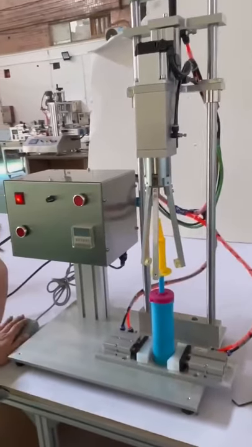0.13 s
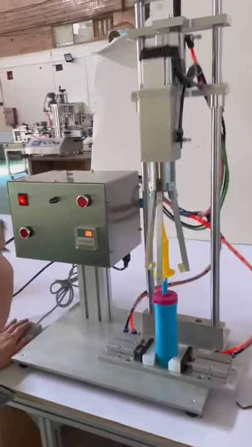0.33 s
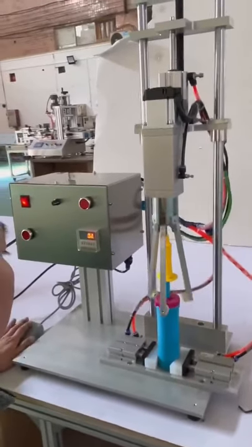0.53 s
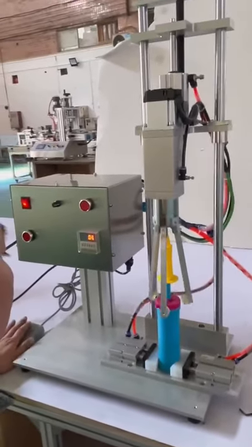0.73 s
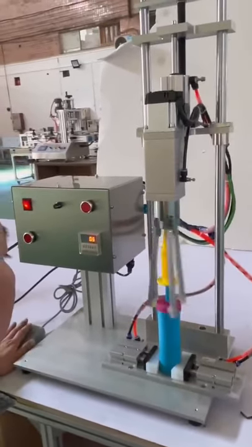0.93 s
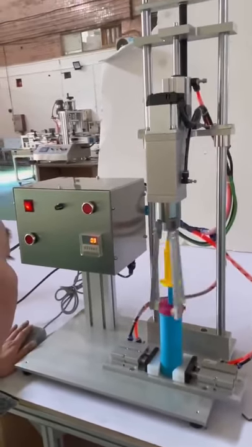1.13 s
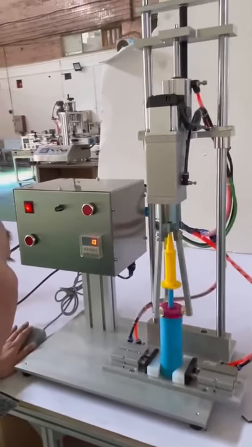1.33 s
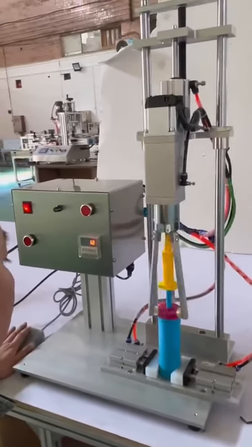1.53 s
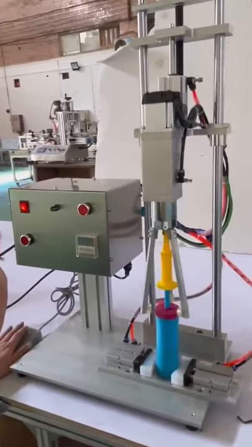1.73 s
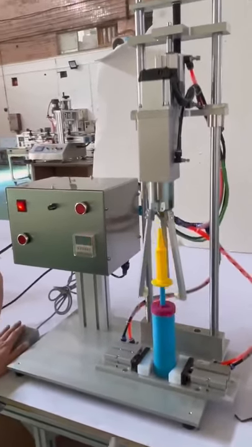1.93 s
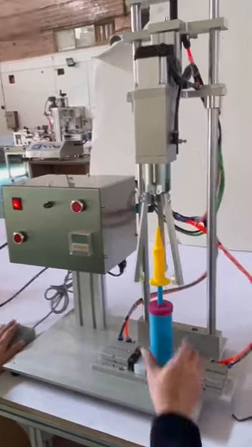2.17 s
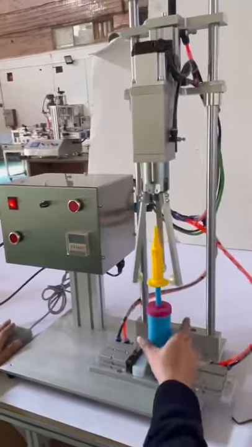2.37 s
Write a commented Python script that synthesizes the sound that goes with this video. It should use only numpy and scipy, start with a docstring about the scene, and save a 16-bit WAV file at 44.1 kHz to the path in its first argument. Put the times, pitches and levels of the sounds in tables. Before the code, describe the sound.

A pneumatic capping machine hisses, thumps and clacks through one cycle over low workshop rumble.

```python
"""Faint ticks over a low workshop rumble, then a valve snaps and dumps air: a pneumatic capping machine
runs one cycle, close to the microphone. The head hisses down and thumps onto its stop, and the jaws
clack shut on the cap. Hard blows run through the frame as short, sinking thumps and ring the bench.
A second blast frees the jaws and the head hisses back up. The limiter ducks after every loud blow."""
import sys
import numpy as np
from scipy import signal
from scipy.fft import rfft, irfft
from scipy.io import wavfile

SR = 44100
rng = np.random.default_rng(int(sys.argv[2]) if len(sys.argv) > 2 else 0)


def dump_mix(stems):
    """Bounce the given channels to the path in sys.argv[1] as a 16-bit WAV at rate SR."""
    frames = np.atleast_2d(stems).T  # one column per channel
    limited = np.clip(frames, -1, 1)  # hard clip at full scale
    pcm = np.round(limited * 32767).astype(np.int16)
    wavfile.write(sys.argv[1], SR, pcm)


N = 105840
T = np.arange(N) / SR
HZ = np.maximum(np.arange(N + 1) * SR / (2 * N), 1)


def from_db(db):
    """Decibels to gain."""
    return 10 ** (np.asarray(db) / 20)


def unit_power(x):
    """Scale to a mean square of one."""
    return x / np.sqrt(np.mean(x ** 2) + 1e-20)


def coloured(x, colour):
    """Filter by a curve of (freq_hz, level_db)."""
    hz, db = np.transpose(colour)
    gain = from_db(np.interp(np.log(HZ), np.log(hz), db))
    return irfft(rfft(x, 2 * N) * gain)[:N]


def noise(colour):
    """Unit-power noise of a given colour."""
    return unit_power(coloured(rng.standard_normal(N), colour))


def envelope(start, rise, hold, t60):
    """Linear rise, hold, exponential fall, all in seconds."""
    t = T - start
    return np.clip(t / rise, 0, 1) * np.exp(-np.log(1000) * np.clip((t - rise - hold) / t60, 0, 10))


def burst(start, hz, octaves, rise_s, t60_s):
    """A brief chatter rings a broad resonance; its power starts near 1."""
    shape = envelope(start, rise_s, 0, t60_s)
    edges = np.clip([hz / 2 ** (octaves / 2), hz * 2 ** (octaves / 2)], 20, SR / 2 - 1000)
    band = signal.butter(2, edges, "band", fs=SR, output="sos")
    ring = signal.sosfilt(band, shape * rng.standard_normal(N) + 1e-18)
    return unit_power(ring) * np.sqrt(np.mean(shape ** 2))


# Room tone of the workshop, all around the microphone: freq_hz, level_db
ROOM_TONE = [(25, 2), (40, -1), (57, 9), (90, -5), (140, -6.5), (300, -14), (700, -20.5), (1500, -32),
             (3000, -39), (6000, -37.5), (8000, -41.5), (11000, -38), (12500, -74), (15000, -66)]

def workshop_rumble(level_db=-33):
    """Steady low noise behind the machine."""
    return from_db(level_db) * noise(ROOM_TONE)


# Hard metal contact, heard up close: freq_hz, level_db
CLICK_COLOUR = [(1500, -66), (3000, -5.5), (5800, 12), (8000, 8), (11000, 11), (13500, -9.5), (15500, -62)]
# Spool, piston and jaws: start_s, ring_db, pitch_hz, width_octaves, rise_s, t60_s, click_db, thud_db
KNOCKS = [(0.201, -34, 1140, 1.4, 0.0019, 0.037, -38.5, -55),
          (.220, -37, 1460, 2.7, 0.00033, 0.073, -23, -36),
          (0.2295, -15.5, 2130, 0.16, 0.0016, 0.04, -22, -46),
          (0.2351, 13.5, 2150, 0.78, 0.0002, 0.0082, 7, -1), (0.284, -11, 1010, 1, 0.0032, 0.039, -36, -48),
          (0.486, -26, 880, 1.46, 0.0019, 0.39, -43, -20),
          (0.493, -18.5, 1310, 1.65, 0.0005, 0.076, -20, -23),
          (0.5043, -25, 2480, 0.88, 0.00052, 0.016, -12, -26),
          (0.504, -12.5, 1160, 1.9, 0.0011, 0.11, -20.5, -12.5),
          (0.768, -21.5, 1920, 0.59, 0.0015, 0.033, -22, -30),
          (0.7752, 1, 1620, 1.13, 0.00099, 0.024, -2, 6), (0.785, -7, 1540, 0.52, 0.0026, 0.049, -17, -11),
          (0.7946, -3, 3470, 1.2, 0.00035, 0.02, 7.5, -29), (0.798, 0, 1110, 1.97, 0.0003, 0.039, -13, -13),
          (1.544, -35.5, 2080, 0.7, 0.00051, 0.27, -36.5, -37),
          (1.5595, 19, 1990, 0.58, 0.00011, 0.0037, -14, 8.5),
          (1.564, 0, 2910, .15, 0.00092, 0.02, -23, -26), (1.574, -6, 915, 0.83, 0.00044, 0.02, -22, -8),
          (1.619, -13.5, 1690, 1.26, 0.004, 0.08, -21, -21.5),
          (2.074, -28, 1870, 0.42, 0.013, 0.058, -42, -36), (2.084, -28, 1440, 3.3, 0.0032, 0.09, -40, -65),
          (2.232, -45, 1900, 0.78, 0.006, 0.036, -57, -49)]

def knocks():
    """Each knock of a moving part has a damped ring, a bright click and a thud of the housing."""
    out = 0
    contact_noise = noise(CLICK_COLOUR)
    for start, ring_db, hz, octaves, rise, t60, click_db, thud_db in KNOCKS:
        ring = from_db(ring_db) * burst(start, hz, octaves, rise, t60)
        click = from_db(click_db) * contact_noise * envelope(start, rise, 0, t60)
        thud = from_db(thud_db) * burst(start, hz=245, octaves=1.9, rise_s=0.0025, t60_s=min(t60, 0.17))
        out += ring + click + thud
    return out


# Thumps in the machine's frame: start_s, level_db, first_pitch_hz, two_octave_sink_s, hold_s
BENDING_WAVES = [(.236, -2.5, 817, 0.0057, 0.0096), (0.503, 0.5, 145.7, 0.22, 0.007),
                 (0.7759, 3.5, 1050, 0.0048, 0.0037), (0.7961, 4.5, 1260, .0036, 0.0024),
                 (1.5609, 5, 640, 0.01093, 0.0066), (1.573, 3, 882, .0062, 0.0057),
                 (2.082, -24.5, 95, 0.62, 0.035)]

def bending_waves():
    """Each hard blow sends a bending wave down the frame; its highs arrive first, so the pitch sinks."""
    out = 0
    for start, db, hz, sink, hold in BENDING_WAVES:
        age = np.maximum(T - start, 0)
        cycles = hz * age / (1 + age / sink)
        shape = envelope(start, rise=0.33 / hz, hold=hold, t60=4.2 * hold)
        out += from_db(db) * shape * np.sin(2 * np.pi * cycles)
    return out


# Resonances and hollows of the air line behind each exhaust port: freq_hz, width_hz, gain_db
DOWN_PIPE = [(1090, 260, -7), (1660, 104, -13), (2390, 140, 3), (2850, 260, -7), (3510, 162, -13),
             (3780, 83, -16), (4400, 70, 4), (5290, 237, -9), (5650, 90, 4), (7080, 70, 6),
             (7330, 155, -13), (8080, 110, -16), (8240, 90, 6), (10410, 221, 9), (11200, 100, 8),
             (11460, 60, 6)]
UP_PIPE = [(1930, 100, 3), (2540, 169, -5), (2820, 60, -16), (3380, 229, -17), (3670, 205, -5),
           (4160, 125, -7), (4400, 197, -14), (5180, 260, -7), (5480, 90, 3), (6720, 90, 10), (7030, 60, 8),
           (7780, 52, -14), (10390, 100, 5), (11600, 138, 6), (11970, 260, -5)]

def air_jets(down_colour, up_colour):
    """Jet noise for the down and up strokes, each coloured by its port and its air line."""
    jets = []
    for colour, pipe in ((down_colour, DOWN_PIPE), (up_colour, UP_PIPE)):
        jet = noise(colour)
        for hz, width_hz, gain_db in pipe:
            band = signal.lfilter(*signal.iirpeak(hz, hz / width_hz, fs=SR), jet)
            jet = jet + (from_db(gain_db) - 1) * band
        jets.append(unit_power(jet))
    return jets


# The two exhaust ports dumping air near the microphone: freq_hz, level_db
DOWN_BLAST_COLOUR = [(150, 7.5), (350, -33), (600, -8), (1000, 2.5), (1450, -4), (1900, 7), (2400, 6),
                     (2800, 0.5), (3250, 10), (4200, 2.5), (5700, 8), (7000, 2.5), (8300, 5.5), (10600, 5),
                     (12200, 0.5), (13800, -16), (14600, -27)]
UP_BLAST_COLOUR = [(150, -8), (350, -8), (700, -4.5), (1300, -7), (1950, 0), (2600, -4.5), (3000, 1),
                   (4300, -3), (5700, 0.5), (7000, -8.5), (8400, 5), (10200, 6.5), (11100, 4.5),
                   (12200, -4.5), (13800, -19), (15000, -31)]
# The valve switching, down then up: start_s, dump_db, hold_s, dump_t60_s, bleed_db, bleed_t60_s
VALVE_BLASTS = [(0.239, 6.5, 0.0052, 0.06, 0, 0.31), (1.562, 7, 0.0049, 0.065, 5, 0.19)]

def valve_blasts(rise_s=0.00092):
    """Each switch of the valve dumps a chamber: a sharp blast with a low puff, then a slower bleed."""
    out = 0
    jets = air_jets(DOWN_BLAST_COLOUR, UP_BLAST_COLOUR)
    for (start, dump_db, hold, dump_t60, bleed_db, bleed_t60), jet in zip(VALVE_BLASTS, jets):
        puff = from_db(dump_db - 16) * burst(start, hz=194, octaves=1.4, rise_s=0.0039, t60_s=0.052)
        dump = from_db(dump_db) * envelope(start, rise_s, hold, dump_t60)
        bleed = from_db(bleed_db) * envelope(start, rise_s, hold, bleed_t60)
        out += puff + jet * np.hypot(dump, bleed)
    return out


# Throttled air at close range: freq_hz, level_db
DOWN_HISS_COLOUR = [(150, 0.5), (300, -6), (600, -18.5), (1000, -6), (1400, -9), (2000, -5), (2700, -7.5),
                    (3300, -1.5), (4400, -5.5), (5650, 3), (6500, -3.5), (8300, -4), (10400, -8),
                    (11800, -14), (13800, -26), (14500, -35)]
UP_HISS_COLOUR = [(150, -6), (400, -9), (1300, -5.5), (1900, 0.5), (2600, -6.5), (3400, -1), (4000, 3),
                  (4500, 0), (5600, 7.5), (6200, -1), (6900, -1), (8400, 5.5), (10200, -6.5), (11400, -9.5),
                  (13000, -18), (14000, -49)]
# Travel of the head, down then up: start_s, end_s, level_db, slope_db_per_s
HEAD_STROKES = [(0.244, 0.496, -22, -5), (1.594, 2.078, -26.5, -12)]

def stroke_hiss(rise_s=0.029, fall_s=0.0086, bleed_db=-14.5, bleed_fall_s=0.15):
    """Air leaves through a throttle while the piston travels; then what is left in the line bleeds off."""
    out = 0
    jets = air_jets(DOWN_HISS_COLOUR, UP_HISS_COLOUR)
    for (start, end, db, slope_db_per_s), jet in zip(HEAD_STROKES, jets):
        travel_s = np.clip(T, start, end) - start
        stopped_s = np.maximum(T - end, 0)
        opening = np.clip((T - start) / rise_s, 0, 1)
        closing = np.exp(-stopped_s / fall_s)
        bleed = from_db(bleed_db) * np.exp(-stopped_s / bleed_fall_s)
        flow = opening * np.maximum(closing, bleed)
        out += jet * flow * from_db(db + slope_db_per_s * travel_s)
    return out


# Jaws tapping the head: start_s, level_db
JAW_TAPS = [(.287, -24), (1.622, -7), (2.092, -28.5)]
# Ring of the jaws: pitch_hz, level_db, t60_s
JAW_MODES = [(835, -14, 0.12), (932, -1.5, 0.067), (1690, -10, 0.082)]

def jaw_taps(rise_s=0.0012, hold_s=0.0031):
    """The loose jaws swing against the head and ring briefly."""
    out = 0
    for start, db in JAW_TAPS:
        for hz, mode_db, t60 in JAW_MODES:
            shape = envelope(start, rise_s, hold_s, t60)
            out += from_db(db + mode_db) * shape * np.sin(2 * np.pi * hz * (T - start))
    return out


# Blows that reach the stand and bench under the machine: start_s, level_db, contact_s
HEAVY_BLOWS = [(0.505, -2.5, 0.002), (0.782, -5, 0.005), (1.56, -8.5, 0.0041), (2.08, -12, 0.021)]
# Ring of stand and bench: pitch_hz, level_db, t60_s
BENCH_MODES = [(70.2, -22.5, 0.6), (91.9, -9.5, 0.38), (126, -11, 0.18), (149.5, -14, 0.47),
               (200.7, -20, 0.5), (305.5, -21.5, 1), (422, -25, 0.23), (483, -21, 0.24), (610, -30, 0.31),
               (763, -7, 0.096)]

def bench_thumps(loose_parts_db=-20.5):
    """Heavy blows shake loose parts and ring the low modes of stand and bench."""
    out = 0
    for start, db, contact in HEAVY_BLOWS:
        loose_parts = burst(start, hz=166, octaves=1.98, rise_s=0.0027, t60_s=0.77)
        out += from_db(db + loose_parts_db) * loose_parts
        for hz, mode_db, t60 in BENCH_MODES:
            gain = from_db(db + mode_db) / np.hypot(1, 2 * hz * contact)  # soft contact spares the highs
            out += gain * envelope(start, contact, 0, t60) * np.sin(2 * np.pi * hz * (T - start))
    return out


# What the workshop walls return to the microphone: freq_hz, level_db
REVERB_COLOUR = [(100, -18.5), (400, -30), (1000, -24.5), (2500, -30), (6000, -23), (11000, -25.5),
                 (14000, -40)]

def workshop_reverb(x, split_hz=2400, build_s=0.0068, low_t60_s=1.52, high_t60_s=0.65):
    """The room's diffuse tail, shorter in the treble."""
    white = rng.standard_normal(N)
    low = signal.sosfilt(signal.butter(1, split_hz, fs=SR, output="sos"), white)
    high = white - low
    tail = low * envelope(0, build_s, 0, low_t60_s) + high * envelope(0, build_s, 0, high_t60_s)
    return signal.fftconvolve(coloured(x, REVERB_COLOUR), tail / np.sqrt(np.sum(tail ** 2)))[:N]


def scene():
    """One microphone close to the machine, with the workshop behind it."""
    machine = valve_blasts() + stroke_hiss() + knocks() + bending_waves() + jaw_taps() + bench_thumps()
    return (machine + workshop_reverb(machine) + workshop_rumble())[None]


def limiter(x, threshold_db=2, attack_s=0.00014, release_db_per_s=57):
    """The gain drops at once on a peak and climbs back at a steady rate."""
    over_db = np.maximum(20 * np.log10(np.abs(x) + 1e-9) - threshold_db, 0)
    held_db = np.maximum.accumulate(over_db + release_db_per_s * T) - release_db_per_s * T
    pole = np.exp(-1 / (attack_s * SR))
    duck_db = signal.lfilter([1 - pole], [1, -pole], held_db)
    return x * from_db(-duck_db)


# Dips cut by the microphone's port: freq_hz, width_hz, depth_db
MIC_DIPS = [(4916, 460, -27), (9086, 2180, -87)]
LOW_CUT_HZ, HIGH_CUT_HZ, CEILING = 55, 15900, 0.66

def record(dry):
    """The microphone port cuts two dips; then come limiter, low cut, rounded peaks and high cut."""
    x = dry[0]
    for hz, width_hz, depth_db in MIC_DIPS + MIC_DIPS:  # two stages, half the depth each
        floor = from_db(depth_db / 2)
        notched = signal.lfilter(*signal.iirnotch(hz, hz / width_hz, fs=SR), x)
        x = floor * x + (1 - floor) * notched
    x = signal.sosfilt(signal.butter(2, LOW_CUT_HZ, "high", fs=SR, output="sos"), limiter(x))
    rounded = x / (1 + (x / CEILING) ** 6) ** (1 / 6)
    return signal.sosfilt(signal.cheby2(12, 70, HIGH_CUT_HZ, fs=SR, output="sos"), rounded)[None]


dry = scene()
out = record(dry)
dump_mix(out)
```